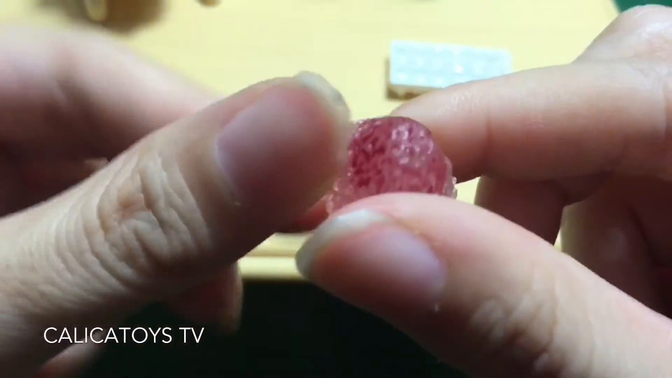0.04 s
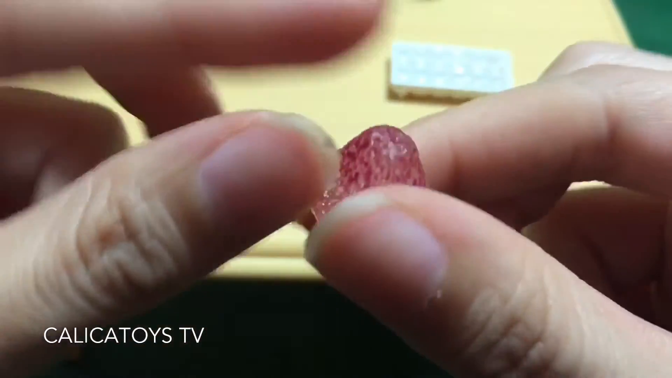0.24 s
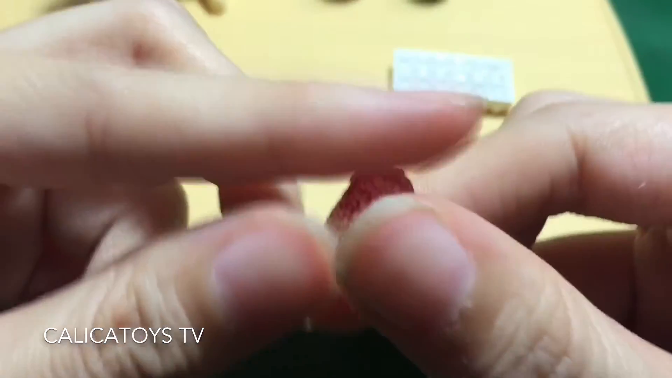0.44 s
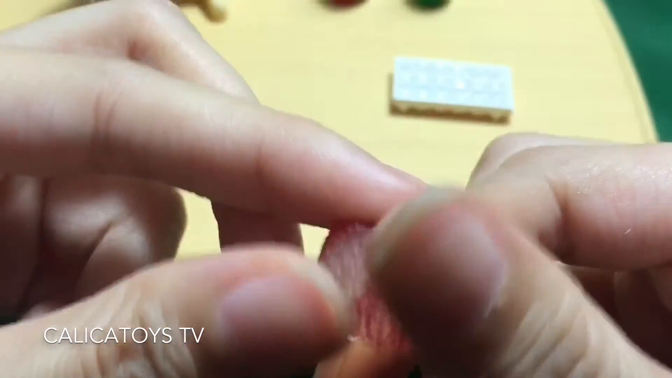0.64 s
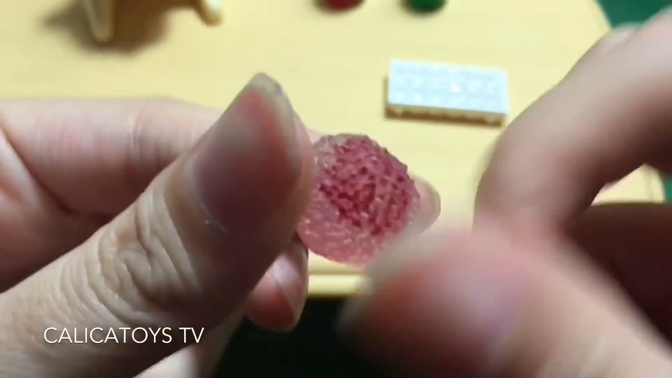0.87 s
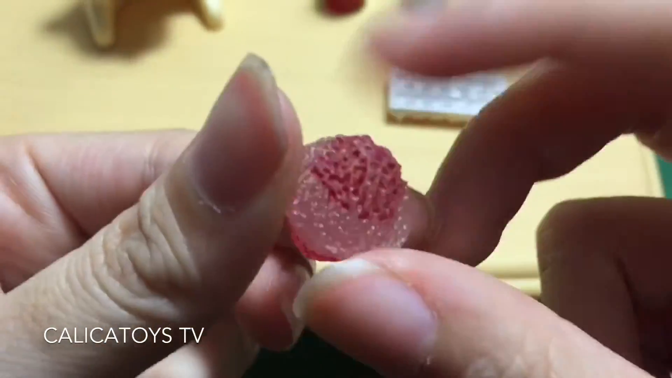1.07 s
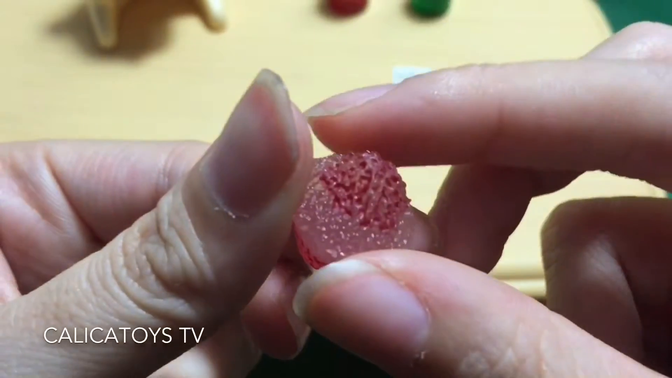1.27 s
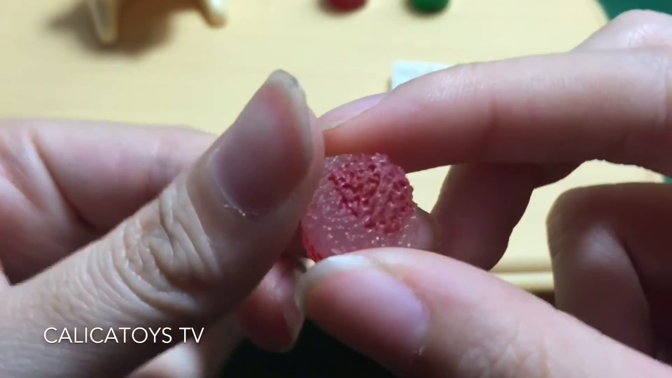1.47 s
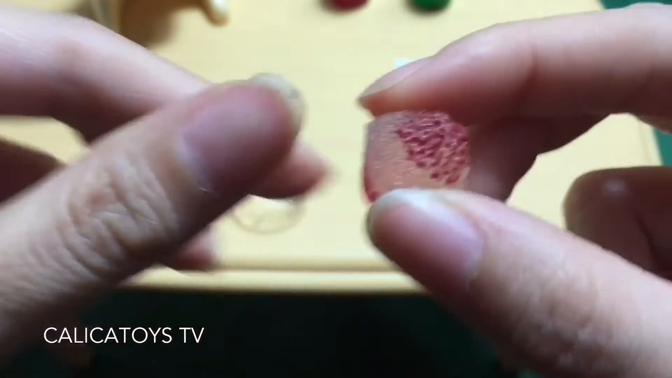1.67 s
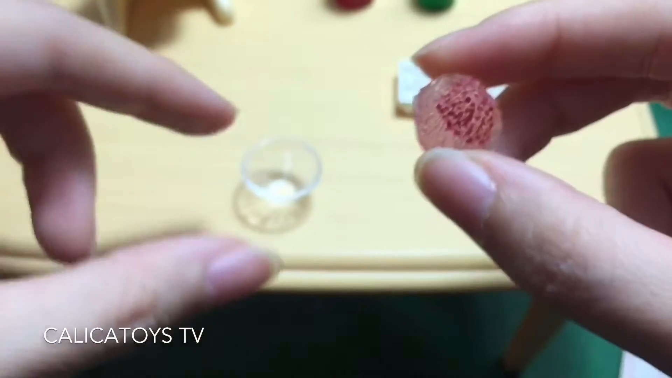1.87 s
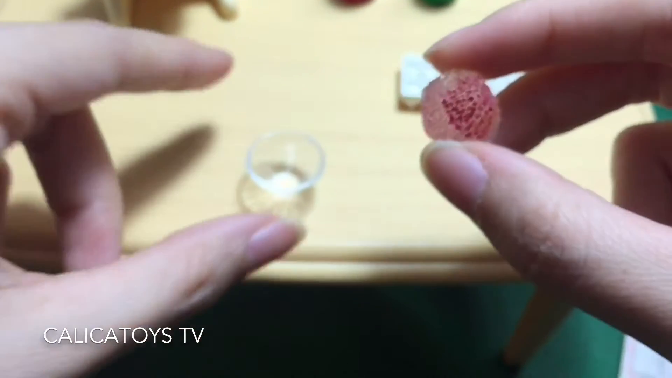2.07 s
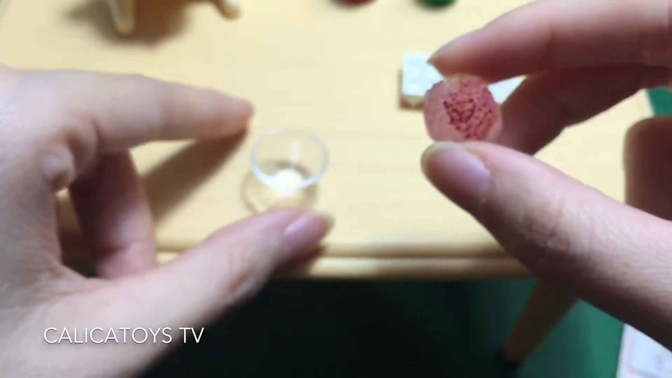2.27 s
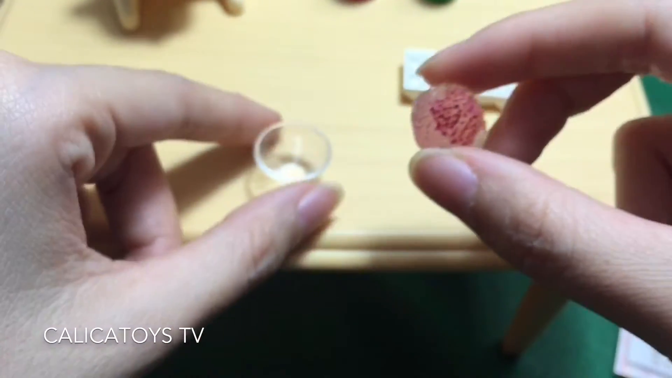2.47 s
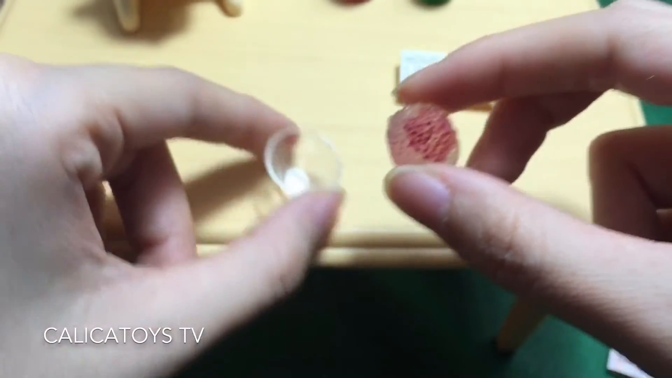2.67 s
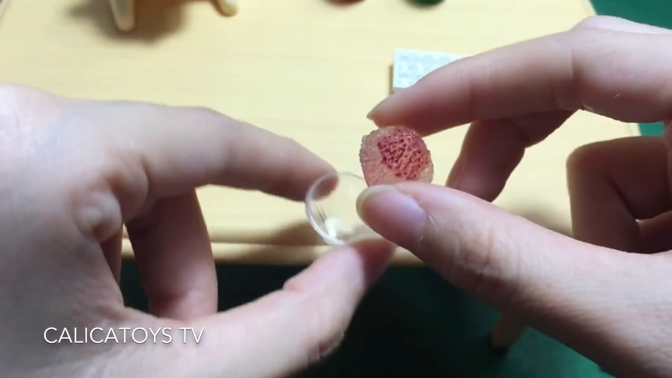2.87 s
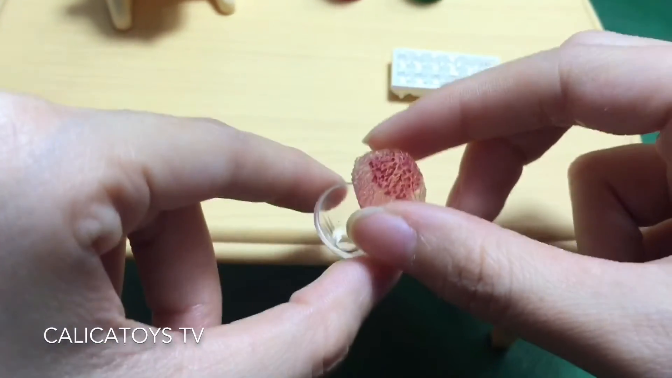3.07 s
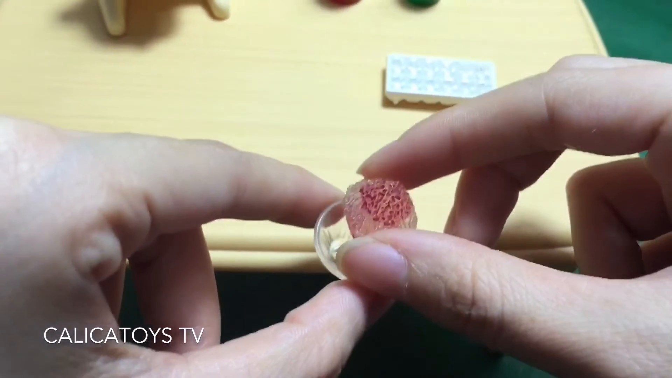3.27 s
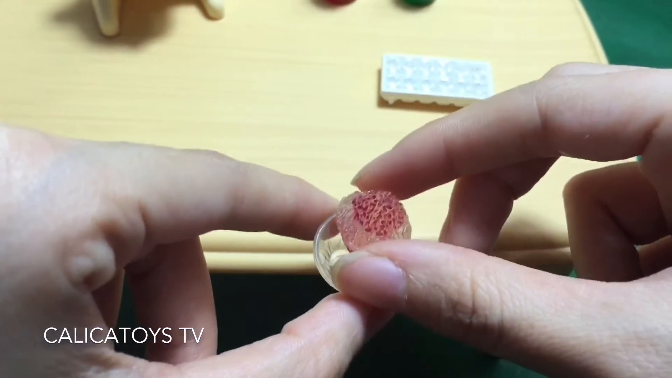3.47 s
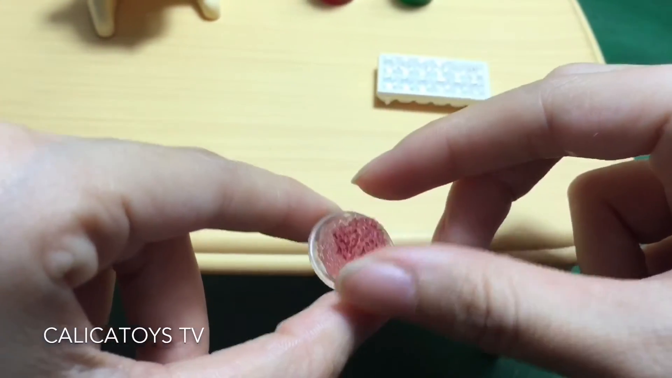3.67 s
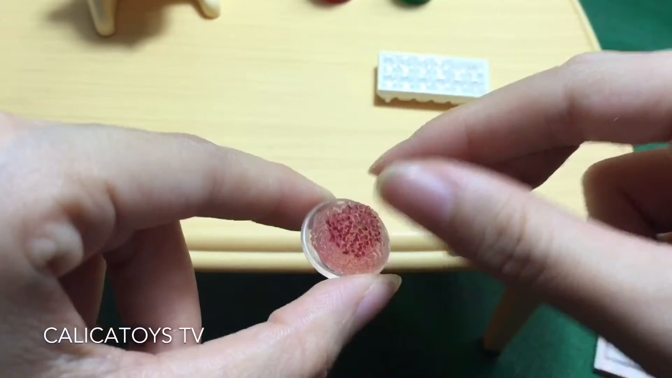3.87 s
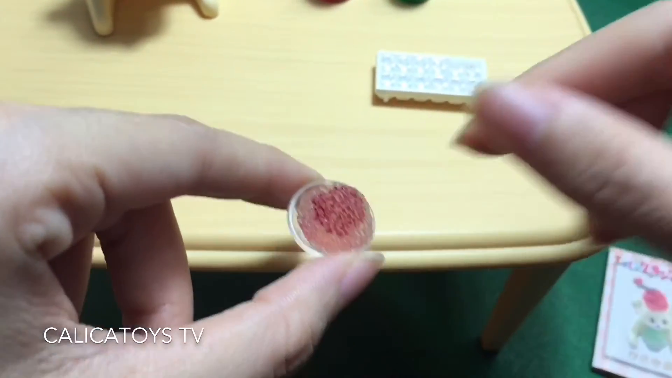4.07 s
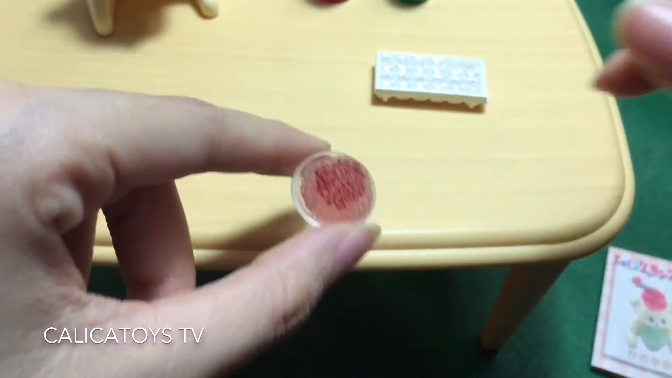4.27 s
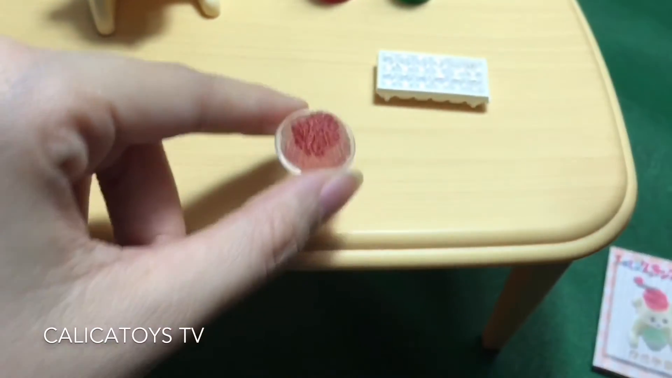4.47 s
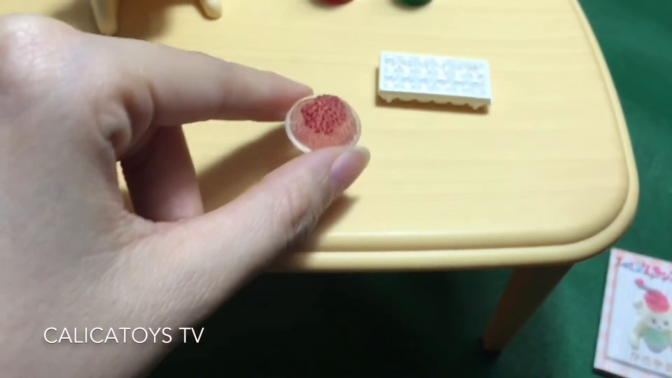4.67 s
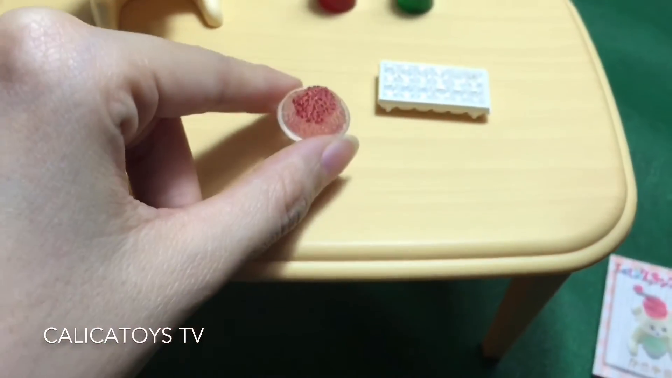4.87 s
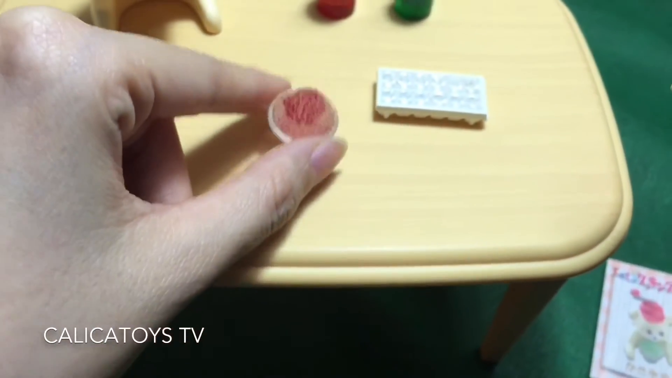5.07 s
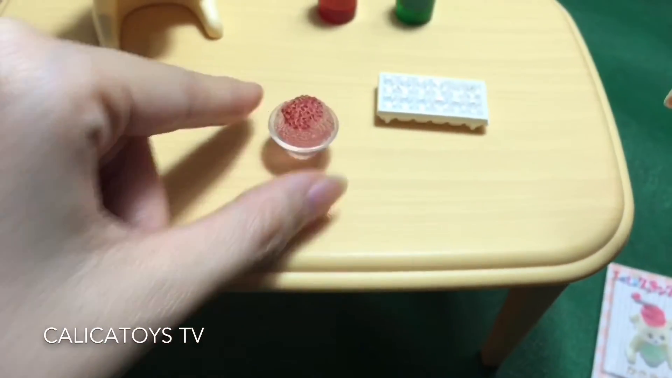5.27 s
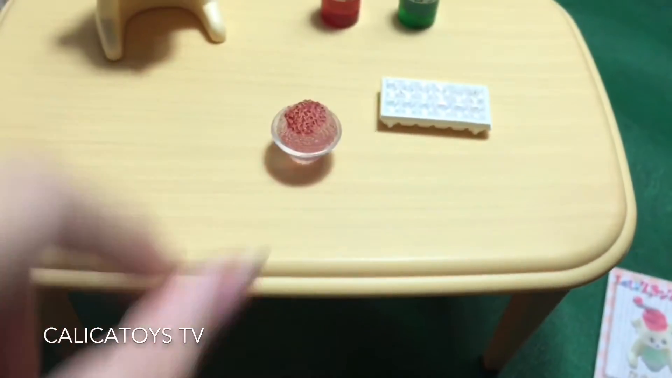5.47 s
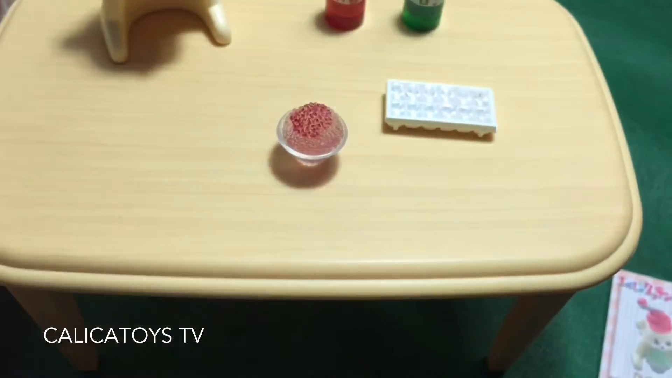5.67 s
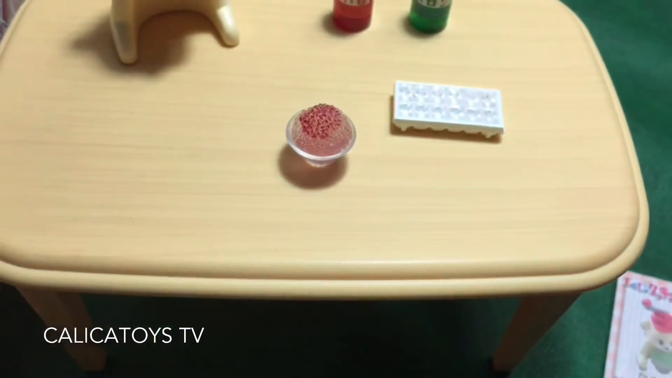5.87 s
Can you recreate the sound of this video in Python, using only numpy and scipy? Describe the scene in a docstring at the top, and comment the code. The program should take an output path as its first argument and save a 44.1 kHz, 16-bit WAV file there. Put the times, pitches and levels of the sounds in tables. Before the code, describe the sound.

In a small room with a wavering low motor hum, rumble and soft hiss, hands quietly handle miniature toys. Very faint knocks and squeaks come as a tiny dish is lifted from a plastic table. A sweet then scrapes and snaps sharply into it. Later the dish lands with a loud hard clack and quick dying rattle. One close microphone, faint room echo.

```python
"""A motor hums in a small room over rumble and hiss: wavering tones and shaped noise.
Soft knocks and faint stick-slip squeaks come as a tiny dish is picked up from a hollow plastic toy table.
A resin sweet is pressed in: gritty slips scrape along the rim, then sharp ticks ring the dish as it snaps home.
The dish is set down with a clack, rocks briefly and is nudged: blows ring the table's modes.
One close microphone."""
import sys
import numpy as np
from scipy import signal
from scipy.fft import rfft, irfft
from scipy.io import wavfile
from scipy.ndimage import map_coordinates

SR = 44100
rng = np.random.default_rng(int(sys.argv[2]) if len(sys.argv) > 2 else 0)


def wav_out(sig):
    """Save sig, one row per channel (or a flat mono array), as 16-bit PCM at SR to the path in sys.argv[1]."""
    wavfile.write(sys.argv[1], SR, np.round(np.clip(np.atleast_2d(sig).T, -1, 1) * 32767).astype(np.int16))


N = 261513
TIME_S = np.arange(N) / SR


def amp(db):
    """Decibels to gain."""
    return 10 ** (np.asarray(db) / 20)


def unit(x):
    """Scales to rms 1."""
    return x / np.sqrt(np.mean(x ** 2) + 1e-20)


def read(points, hz):
    """Interpolates a (freq_hz, value) table on a log-frequency axis."""
    freq_hz, value = np.transpose(points)
    return np.interp(np.log(hz + 1), np.log(freq_hz + 1), value)


def add(mix, start_s, sound):
    """Mixes a sound in at a time, cut at the end of the mix."""
    part = mix[round(start_s * SR):][:len(sound)]
    part += sound[:len(part)]


def noise(spectrum, size):
    """Noise of rms 1 with a given spectrum."""
    white = rfft(rng.standard_normal(size))
    gain = amp(read(spectrum, np.fft.rfftfreq(size, 1 / SR)))
    return unit(irfft(white * gain, size))


def pulse(spectrum, size):
    """Minimum-phase click of energy 1: the sharpest causal one with a given spectrum."""
    log_gain = np.log(amp(read(spectrum, abs(np.fft.fftfreq(size, 1 / SR)))))
    click = np.fft.ifft(np.exp(np.conj(signal.hilbert(log_gain)))).real
    return click / np.linalg.norm(click)


def resonate(x, hz, pole_width_hz):
    """Steep double-pole resonance; hz may be a pitch curve."""
    turn = np.exp(2j * np.pi * np.cumsum(hz * np.ones(len(x))) / SR)
    r = np.exp(-np.pi * pole_width_hz / SR)
    # shift the resonance to 0 Hz, low-pass, shift back
    return 2 * (turn * signal.lfilter([(1 - r) ** 2], [1, -2 * r, r * r], x / turn)).real


def ring(modes, t):
    """One dying sine a row, from (pitch_hz, level_db, t60_s)."""
    return np.array([amp(db - 60 * t / t60_s) * np.sin(2 * np.pi * hz * t) for hz, db, t60_s in modes])


def alternate(modes):
    """Signs of the modes: neighbours swing in opposite directions."""
    return (-1) ** np.arange(len(modes))


def drift(rate_hz):
    """Slow random wander of rms 1: cubic curve through random knots."""
    knots = rng.standard_normal(int(N / SR * rate_hz) + 3)
    return unit(map_coordinates(knots, [TIME_S * rate_hz], order=3, mode="nearest"))


def band(x, low_hz, high_hz):
    """Zero-phase band-pass."""
    return signal.sosfiltfilt(signal.butter(2, [low_hz, high_hz], "band", fs=SR, output="sos"), x)


# room rumble shape: freq_hz [Hz], density_db [dB per Hz, relative]
RUMBLE_SPECTRUM = [(20, -33), (45, -29.5), (95, -22), (125, -10), (150, -8), (175, -11.5), (205, -18.5),
                   (236, -10), (260, -20), (345, -20.5), (390, -37), (700, -64.5)]
# room air and microphone hiss shape: freq_hz [Hz], density_db [dB per Hz, relative]
HISS_SPECTRUM = [(100, 2), (400, -5), (650, -7.5), (820, -7.5), (1900, -10), (2700, -14), (4400, -16.5),
                 (5000, -20), (5500, -17), (6600, -18.5), (7600, -23), (9000, -21.5), (10400, -26.5),
                 (15500, -27.5)]
# room resonances stirred by the motor's noise:
# pitch_hz [Hz], half_width_hz [Hz, half of one pole's width], level_db [dB rms]
ROOM_RESONANCES = [(426, 15, -80.5), (491.5, 13.5, -78.5), (547, 27, -76.5), (599.5, 25.5, -73),
                   (712, 28, -77), (877, 50, -82), (1114, 15, -83), (1235, 37, -83.5)]
RUMBLE_DB, HISS_DB = -54.5, -66  # rms, ahead of surges and flicker


def air(flicker_db=0.6, swell_db=3.5, surge_db=2.0, surge_hz=8, eddy_db=3.5, eddy_hz=12):
    """Surging rumble with a wandering upper part, swelling resonances, hiss with a flickering middle."""
    resonances = np.zeros(N)
    for pitch_hz, half_width_hz, level_db in ROOM_RESONANCES:
        peak = resonate(rng.standard_normal(N), pitch_hz, 2 * half_width_hz)
        resonances += amp(level_db) * unit(amp(swell_db * drift(15)) * peak)
    hiss = amp(HISS_DB) * noise(HISS_SPECTRUM, N)
    flicker = (amp(flicker_db * drift(20)) - 1) * band(hiss, 400, 2200)
    rumble = amp(RUMBLE_DB + surge_db * drift(surge_hz)) * noise(RUMBLE_SPECTRUM, N)
    eddies = (unit(amp(eddy_db * drift(eddy_hz))) - 1) * band(rumble, 210, 750)
    return rumble + eddies + hiss + flicker + resonances


# motor's main tone, swells and dips ahead of waver: time_s [s], level_db [dB rms]
HUM_LEVEL = [(0.0, -54), (0.11, -47), (1.06, -47), (1.22, -57.5), (1.52, -48.5), (1.82, -51), (1.86, -43.5),
             (2.14, -48.5), (2.23, -44.5), (2.31, -47.5), (2.34, -63), (2.43, -55.5), (2.53, -44),
             (3.06, -52), (3.24, -47), (4.82, -45.5), (4.94, -52), (5.42, -49), (5.53, -85), (5.58, -47.5),
             (5.93, -51.5)]
# weaker motor and mains tones and faint whine, ahead of flutter: pitch_hz [Hz], level_db [dB rms]
HUM_LINES = [(58.6, -63.5), (114.5, -63), (117, -70), (120, -79), (196.5, -78), (230.5, -67), (240, -65),
             (278, -74), (305.2, -69), (345.5, -79.5), (354.5, -76.5), (410.5, -81), (916, -85.5),
             (1585, -87.5), (1995, -86.5), (2055, -95.5), (2875, -92.5), (3400, -92)]
HUM_HZ = 153.2


def motor(wander_rad=0.19, flutter_db=-1.04, waver_db=1.5, waver_hz=14):
    """One strong tone and many faint ones, each wavering a little in phase and level."""
    def tone(hz):
        """Sine of rms 1, random start, wandering phase."""
        return np.sqrt(2) * np.sin(2 * np.pi * (hz * TIME_S + rng.random()) + wander_rad * drift(2.79))

    main_db = np.interp(TIME_S, *np.transpose(HUM_LEVEL)) + waver_db * drift(waver_hz)
    hum = amp(main_db) * tone(HUM_HZ)
    for pitch_hz, level_db in HUM_LINES:
        hum += amp(level_db + flutter_db * drift(1.85)) * tone(pitch_hz)
    return hum


# room decay: freq_hz [Hz], t60_s [s]
ROOM_DECAY = [(200, 0.37), (900, 0.39), (2500, 0.38), (6000, 0.39), (9000, 0.43), (15000, 0.5)]
# room echo colour: freq_hz [Hz], gain_db [dB, relative]
ROOM_COLOUR = [(600, -3), (1200, -1), (1900, 1), (2350, 5), (2900, 2), (3400, 2), (4400, 3), (5500, 1),
               (7200, 0), (8150, -4), (9000, 2), (15000, 5.5)]


def room(x, build_s=0.0019):
    """Diffuse tail of energy 1, each band dying at its own speed."""
    hz, t, grid = signal.stft(rng.standard_normal(SR // 2), SR, nperseg=256)
    decay_db = read(ROOM_COLOUR, hz)[:, None] - 60 * t / read(ROOM_DECAY, hz)[:, None]
    tail = signal.istft(grid * amp(decay_db), SR, nperseg=256)[1]
    tail *= 1 - np.exp(-(np.arange(len(tail)) / SR / build_s) ** 2)
    return signal.fftconvolve(x, tail / np.linalg.norm(tail))[:N]


# squeaks of the dish dragged by the fingers, ahead of jitter and grab:
# start_s [s], length_s [s], level_db [dB peak of the fundamental], pitch_hz [Hz], rise_hz_per_s [Hz/s]
SQUEAKS = [(2.295, 0.058, -67, 1040, 300), (2.544, 0.035, -63.5, 1500, 11500),
           (2.75, 0.028, -68, 1230, 500), (5.487, .04, -66, 1435, 0)]


def squeak(octave_db=-17, jitter=0.031, grab_db=4):
    """Dish foot sticks and slips on the table: faint, unsteady chirps, most of them rising."""
    out = np.zeros(N)
    for start_s, length_s, level_db, pitch_hz, rise_hz_per_s in SQUEAKS:
        t = np.arange(0, length_s, 1 / SR)
        hz = (pitch_hz + rise_hz_per_s * t) * (1 + jitter * drift(460)[:len(t)])
        phase = 2 * np.pi * np.cumsum(hz) / SR
        swell = amp(level_db + grab_db * drift(440)[:len(t)]) * np.sin(np.pi * t / length_s)
        add(out, start_s, swell * (np.sin(phase) + amp(octave_db) * np.sin(2 * phase)))
    return out


# sweet starts to slide, begins to wedge in the rim, is seated
SLIDE_S, WEDGE_S, SEATED_S = 3.628, 3.691, 3.704
# loose sweet: pitch relative to seated, and its creep
LOOSE_RATIO, CREEP_PER_S = 0.786, 0.79


def wedged(s):
    """How tightly the sweet sits in the rim, 0 (loose) to 1 (seated)."""
    return np.clip((s - WEDGE_S) / (SEATED_S - WEDGE_S), 0, 1)


def stiffness(s):
    """Pitch ratio of the dish: low at first, creeps up under the finger, jumps as the sweet wedges in."""
    sliding = np.minimum(LOOSE_RATIO + CREEP_PER_S * np.maximum(s - SLIDE_S, 0), 1)
    return sliding + (1 - sliding) * wedged(s)


# scrape starts faint, grows as the finger presses, surges in the wedge, dies once seated
SLIDE_DB, PRESS_DB_PER_S, WEDGE_DB, RELEASE_DB_PER_S = -69, 80, 21, 1999.5
SEATED_RIM_HZ = 7750


def scrape(slips_per_s=4000, rim_width_hz=1400, body_hz=2550, body_width_hz=1700, body_db=-6.0):
    """Tiny gritty slips excite the rim, whose pitch rises as the sweet wedges in."""
    slips = rng.standard_normal(N) * (rng.random(N) < slips_per_s / SR)
    rim = unit(resonate(slips, SEATED_RIM_HZ * stiffness(TIME_S), rim_width_hz))
    body = amp(body_db) * unit(resonate(slips, body_hz, body_width_hz))
    pressing_s = np.clip(TIME_S, SLIDE_S, SEATED_S) - SLIDE_S
    resting_s = np.maximum(TIME_S - SEATED_S, 0)
    level_db = SLIDE_DB + PRESS_DB_PER_S * pressing_s + WEDGE_DB * wedged(TIME_S)
    level_db -= RELEASE_DB_PER_S * resting_s
    return amp(level_db) * (rim + body) * (TIME_S > SLIDE_S)


# modes of the little dish with the sweet seated: pitch_hz [Hz], level_db [dB, relative]
DISH_MODES = [(1510, -25), (2080, -19.5), (2500, -17), (2900, -16), (3800, -22), (4440, -16.5), (6150, -13),
              (6650, -5.5), (7500, -4.5), (8120, 2.5), (8600, -5.5), (9350, -22)]
# thin tick of the sweet against the rim: freq_hz [Hz], density_db [dB per Hz, relative]
RIM_TICK_SPECTRUM = [(300, -6), (1150, -18), (2600, 10), (5200, -12), (6600, 4), (8800, 3), (11000, -12),
                     (13000, -2.5), (15000, -1), (16000, -7)]
# sweet or fingernail catching on the dish: start_s [s], level_db [dB, scales modes and tick], body_db [dB added
# to modes under 5 kHz], sharp_db [dB added to the tick and its scatter]
CLICKS = [(3.6115, -54, 7, 0), (3.6275, -49, 8, 6), (3.6379, -42.5, 5.5, 11), (3.6845, -46, 4, 5),
          (3.6898, -41, 6, 0), (3.6998, -46, 14, 3), (3.7014, -43.5, 14, -1), (3.7046, -17, -8, 0.5),
          (3.706, -37.5, 18, 4), (3.7112, -25.5, 5, 6), (3.7148, -39, 10, 0), (4.525, -61, 2, -2)]
DISH_CYCLES, DISH_T60_MAX_S = 38, 0.007  # seated decay: this many cycles, capped


def dish(tick_db=-12, attack_s=0.00008, scatter_db=-28, scatter_decay_s=0.0011, late_db=-48, late_decay_s=0.027):
    """Ticks ring the finger-damped dish and scatter off the hands and the toys nearby."""
    out, t = np.zeros(N), np.arange(SR // 10) / SR
    modes = [(hz, db, min(DISH_CYCLES / hz, DISH_T60_MAX_S)) for hz, db in DISH_MODES]
    low = np.array(DISH_MODES)[:, 0] < 5000
    attack = 1 - np.exp(-(t / attack_s) ** 2)
    early = amp(scatter_db) * np.exp(-t / scatter_decay_s)
    late = amp(late_db) * np.exp(-t / late_decay_s)
    bare_tick = amp(tick_db) * pulse(RIM_TICK_SPECTRUM, len(t))
    for start_s, level_db, body_db, sharp_db in CLICKS:
        tick = bare_tick + noise(RIM_TICK_SPECTRUM, len(t)) * (early + late)
        # scaled time lowers every pitch and lengthens its decay while the sweet is loose
        body = alternate(modes) * amp(body_db * low) @ ring(modes, t * stiffness(start_s))
        add(out, start_s, amp(level_db) * (attack * body + amp(sharp_db) * tick))
    return out


# modes of the hollow table with the dish on it: pitch_hz [Hz], flat_db [dB, dish lands flat],
# edge_db [dB, dish rocks on the edge of its foot], t60_s [s]
TABLE_MODES = [(340, -1.5, -8, 0.011), (520, 8, -2, 0.0095), (678, -14, -5.5, 0.039),
               (740, -13.5, -19, 0.063), (746, 3, -2.5, 0.026), (876, -22, -19, 0.099),
               (950, -13.5, -21.5, .07), (1008, 5.5, 16, .012), (1050, -29, 3, 0.022), (1206, 7, -14, .022),
               (1257, -2, -3, .028), (1556, -7, -6, 0.024), (1682, -9.5, -15, 0.063),
               (2007, -20, -19, 0.048), (2110, -6, -5, 0.033), (2300, -23.5, -16, 0.22),
               (2690, -11.5, -11, 0.065), (2893, -14, -18, 0.094), (3120, -21, -7, .024),
               (3355, 4.5, 3, 0.017), (3800, -7, -5, 0.023), (4130, -6, -17, 0.032),
               (4400, -7, -13.5, .012), (5000, -1, -7, 0.0077), (5570, -13, -24, .042),
               (5700, 1, -16, .013), (6280, -8, -19, 0.034)]
# crowd of short-lived higher table modes: freq_hz [Hz], density_db [dB per Hz, relative]
CRACK_SPECTRUM = [(60, -26), (200, 2), (480, 6.5), (1200, 14.5), (2000, 7), (3200, 3.5), (6400, 2),
                  (8000, -9), (11000, -16), (16000, -8)]
# dense rustle in which the ring fades: freq_hz [Hz], density_db [dB per Hz, relative]
RUSTLE_SPECTRUM = [(300, -21), (750, 3), (1150, -2), (1700, -6), (2350, -0.5), (2900, -6), (3800, -11),
                   (5400, -13), (6600, -19), (8000, -24), (15000, -36)]
# bare tick of hard plastic: freq_hz [Hz], density_db [dB per Hz, relative]
TICK_SPECTRUM = [(300, -7), (1100, -8), (2000, -6), (3500, 0), (5600, 9), (7800, -6), (9500, -6.5),
                 (11000, -10), (15000, -21)]
# contacts with the table: start_s [s], level_db [dB, scales the whole blow],
# soft_hz [Hz above which the blow weakens], touch ["flat" or "edge"]
KNOCKS = [(1.072, -60, 1300, "flat"), (2.522, -59, 750, "flat"), (2.562, -63, 1600, "edge"),
          (2.5665, -48, 654, "flat"), (4.195, -55, 900, "flat"), (5.1674, -18.5, 11500, "flat"),
          (5.1699, -27.5, 4450, "edge"), (5.1812, -45, 3950, "edge"), (5.18798, -38.5, 4300, "edge"),
          (5.1948, -33, 4030, "edge"), (5.1976, -30, 5940, "edge"), (5.2066, -50, 3200, "edge"),
          (5.2179, -37.5, 2460, "edge"), (5.23462, -43.5, 2000, "edge"), (5.490, -64, 1700, "flat"),
          (5.64, -53, 655, "flat")]
HARD_HZ = 11800  # softness of a fully hard contact; softer ones tick less


def table(crack_db=-3.5, crack_decay_s=0.0072, spread_s=0.0022, tick_db=9, chatter_db=3, chatter_hz=450,
          rustle_db=-23, rustle_decay_s=0.04):
    """Contacts tick and chatter; modes, stirred by flat or edge, build as the blow spreads, then rustle."""
    out, t = np.zeros(N), np.arange(SR // 4) / SR
    rings = ring([(hz, 0, t60_s) for hz, _, _, t60_s in TABLE_MODES], t)
    _, flat_db, edge_db, _ = np.transpose(TABLE_MODES)
    swing = alternate(TABLE_MODES)
    modes = {"flat": swing * amp(flat_db) @ rings, "edge": swing * amp(edge_db) @ rings}
    build = 1 - np.exp(-t / spread_s)
    tick = amp(tick_db) * pulse(TICK_SPECTRUM, len(t))
    for start_s, level_db, soft_hz, touch in KNOCKS:
        jumps = np.interp(t * chatter_hz, np.arange(256), rng.standard_normal(256))
        chatter = unit(amp(chatter_db * jumps))
        crack = amp(crack_db) * chatter * noise(CRACK_SPECTRUM, len(t)) * np.exp(-t / crack_decay_s)
        rustle = amp(rustle_db) * noise(RUSTLE_SPECTRUM, len(t)) * np.exp(-t / rustle_decay_s)
        body = signal.lfilter(*signal.butter(3, soft_hz, fs=SR), (modes[touch] + crack + rustle) * build)
        add(out, start_s, amp(level_db) * (body + soft_hz / HARD_HZ * tick))
    return out


def scene(table_room_db=-21, dish_room_db=-21.5):
    """Air, motor and close toys; table and dish feed the room's faint echo almost equally."""
    background = air() + motor()
    knocks = squeak() + table()
    clicks = scrape() + dish()
    echo = room(amp(table_room_db) * knocks + amp(dish_room_db) * clicks)
    return (background + echo + knocks + clicks)[None]


def record(dry, bass_hz=36, treble_hz=15900):
    """Microphone's bass roll-off and a steep treble limit."""
    thin = signal.sosfilt(signal.butter(3, bass_hz, "high", fs=SR, output="sos"), dry)
    treble_limit = signal.firwin(511, treble_hz, window=("kaiser", 9), fs=SR)
    return signal.oaconvolve(thin, treble_limit[None], "same")


dry = scene()
out = record(dry)
wav_out(out)
```